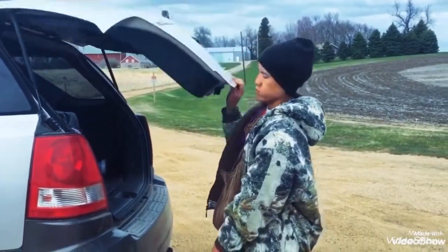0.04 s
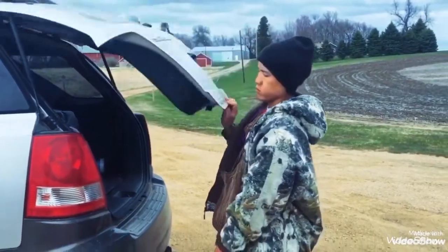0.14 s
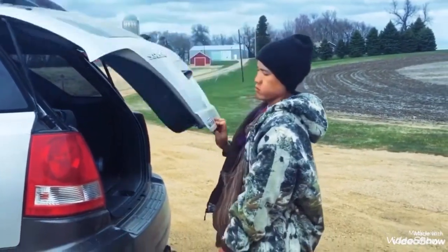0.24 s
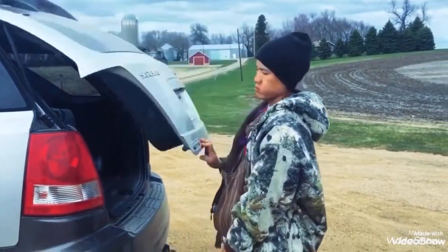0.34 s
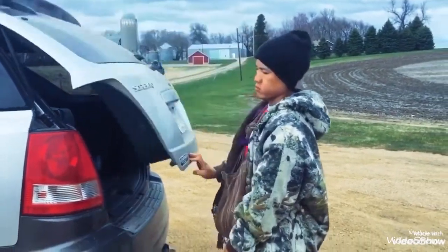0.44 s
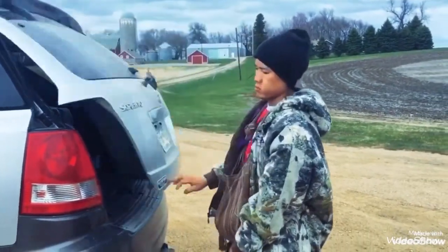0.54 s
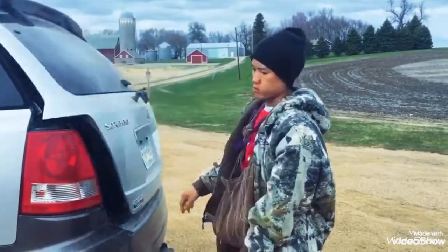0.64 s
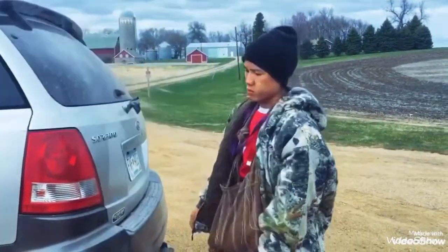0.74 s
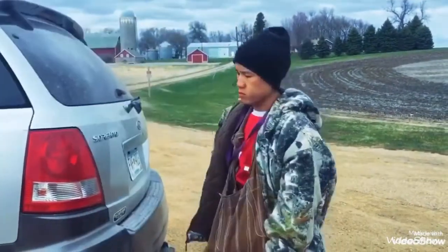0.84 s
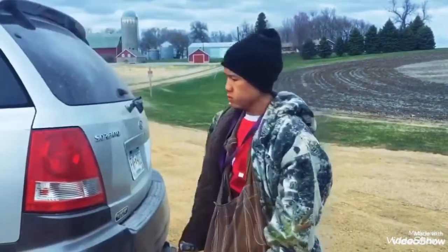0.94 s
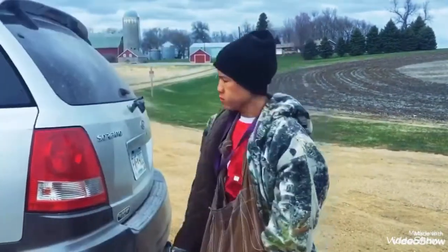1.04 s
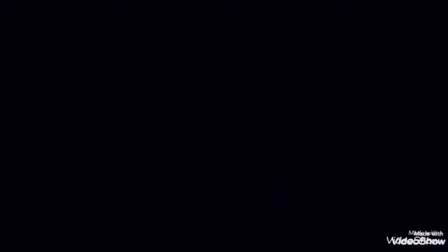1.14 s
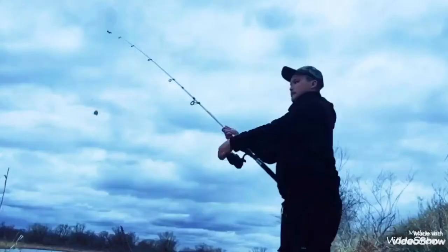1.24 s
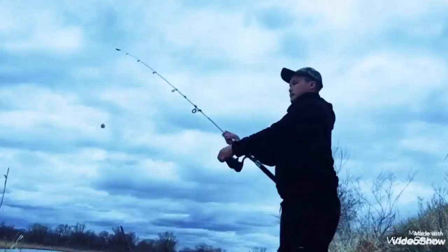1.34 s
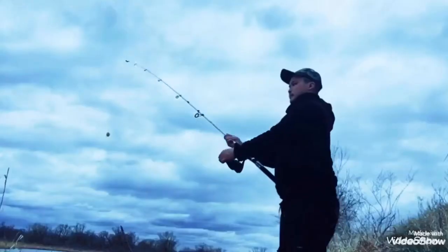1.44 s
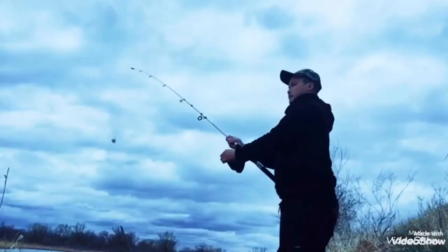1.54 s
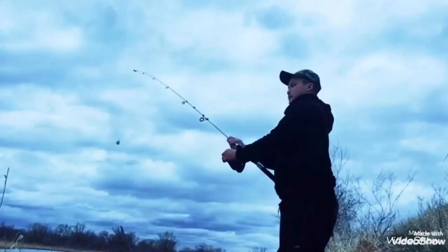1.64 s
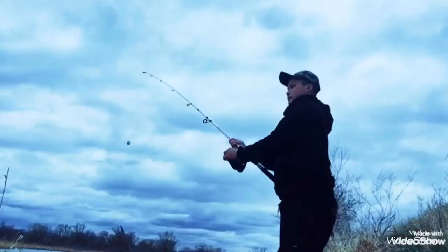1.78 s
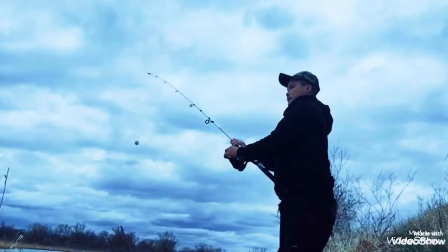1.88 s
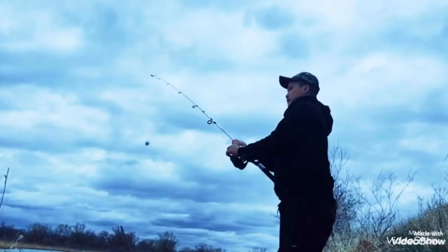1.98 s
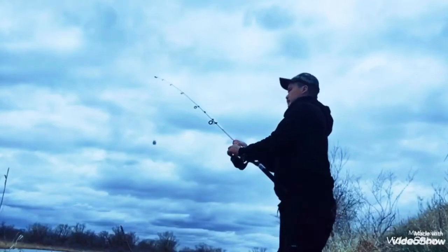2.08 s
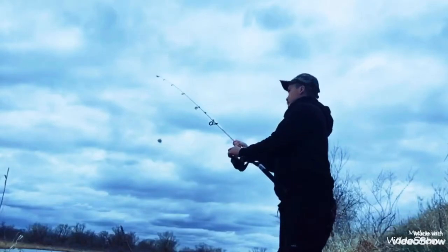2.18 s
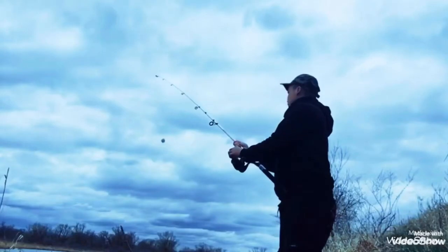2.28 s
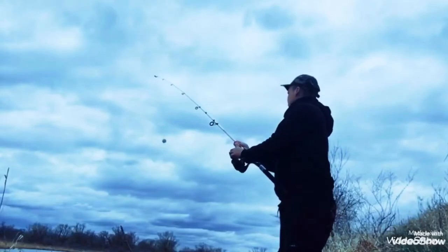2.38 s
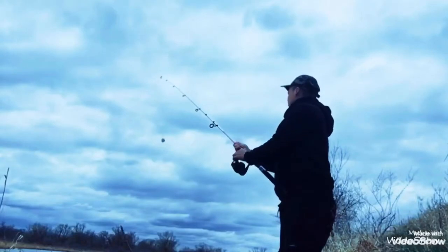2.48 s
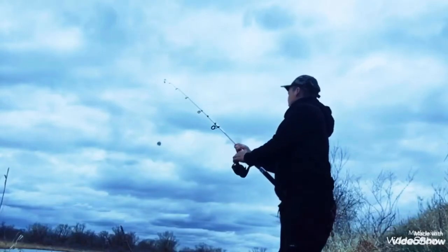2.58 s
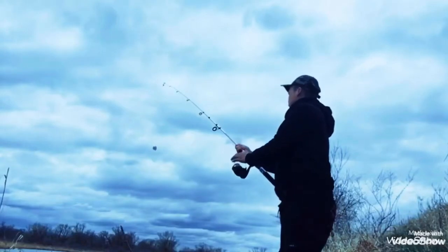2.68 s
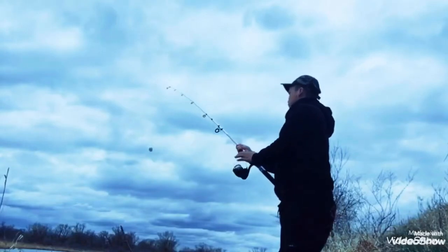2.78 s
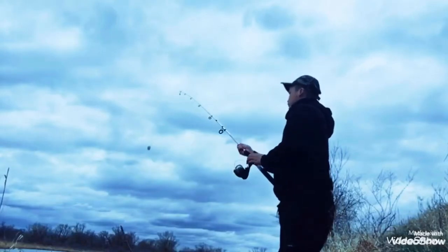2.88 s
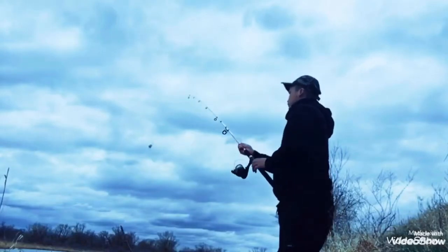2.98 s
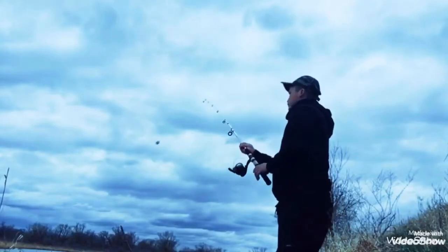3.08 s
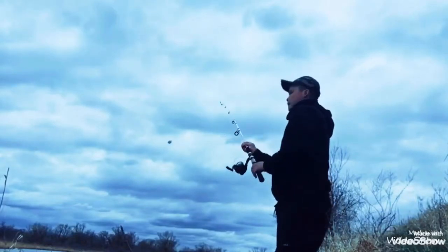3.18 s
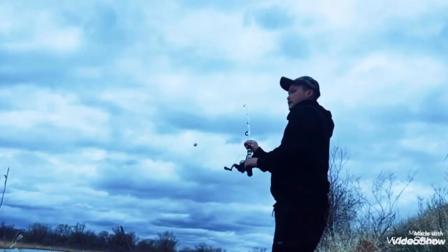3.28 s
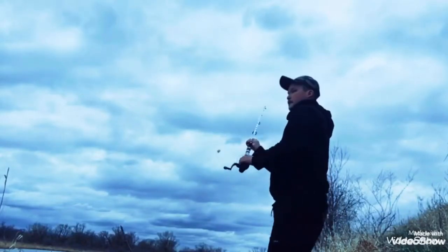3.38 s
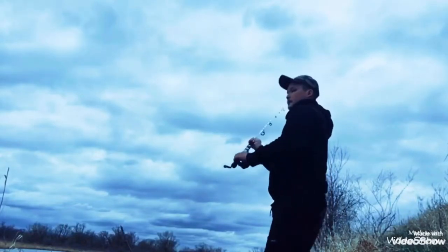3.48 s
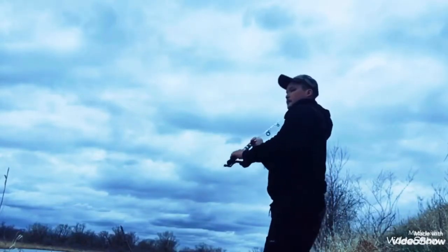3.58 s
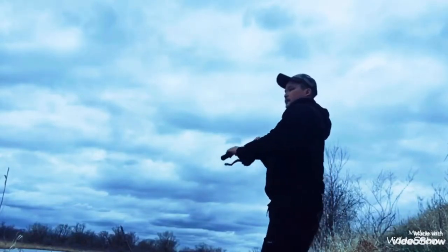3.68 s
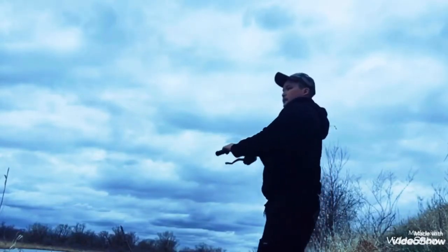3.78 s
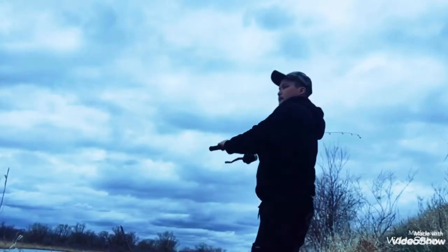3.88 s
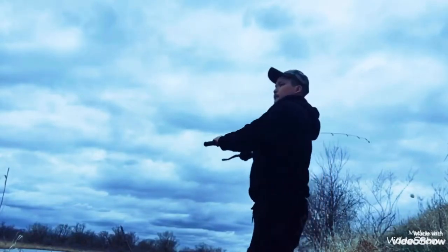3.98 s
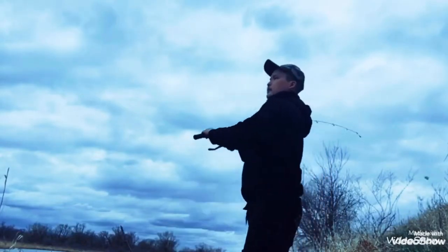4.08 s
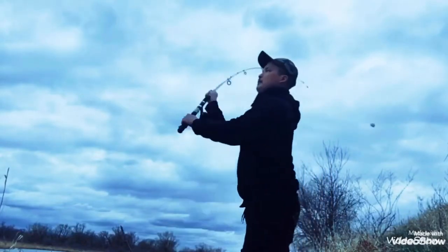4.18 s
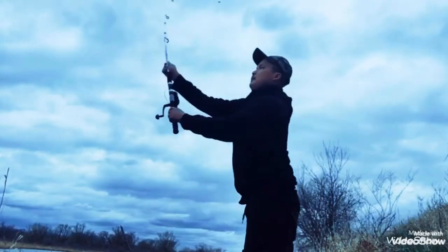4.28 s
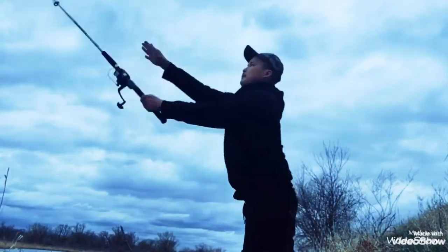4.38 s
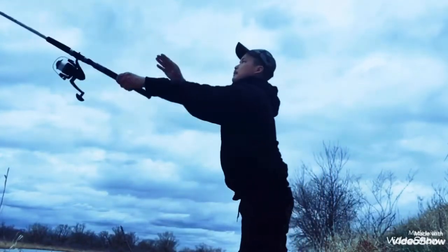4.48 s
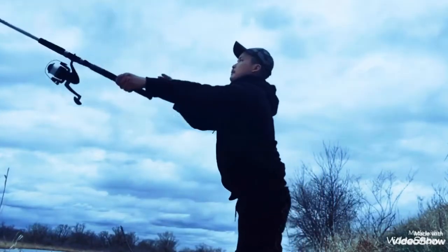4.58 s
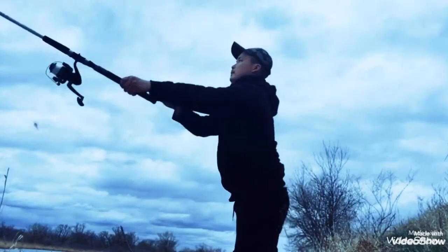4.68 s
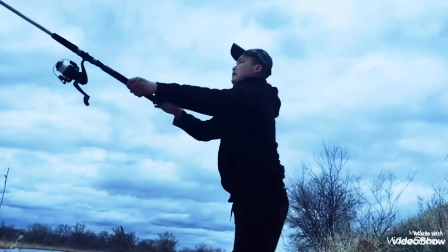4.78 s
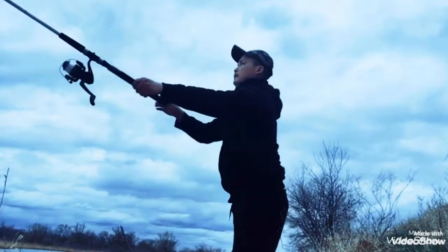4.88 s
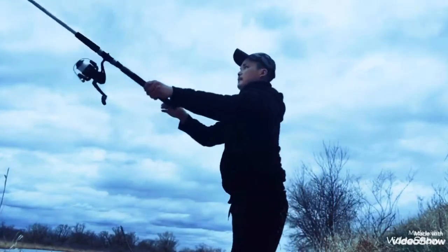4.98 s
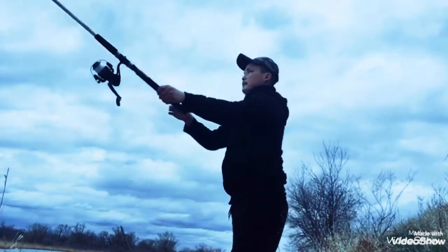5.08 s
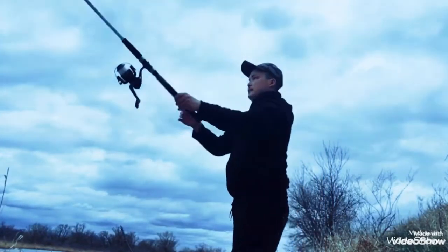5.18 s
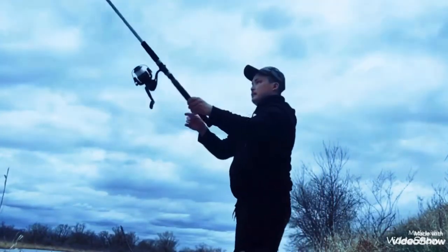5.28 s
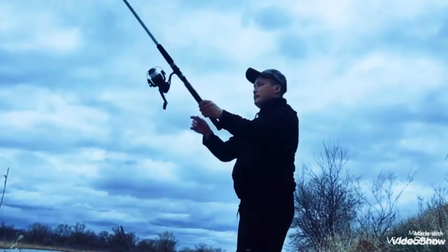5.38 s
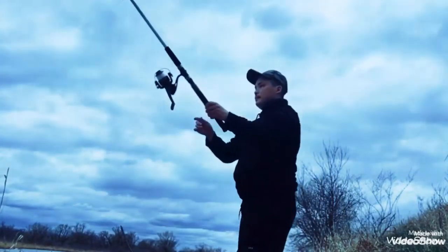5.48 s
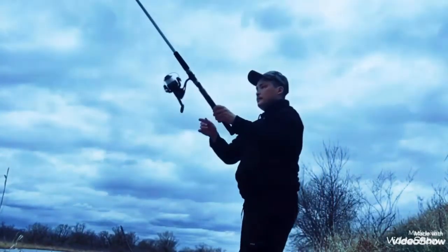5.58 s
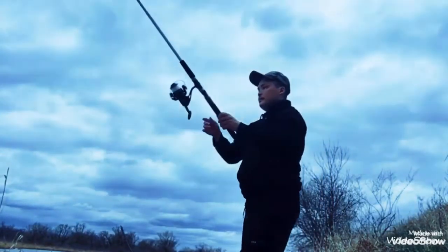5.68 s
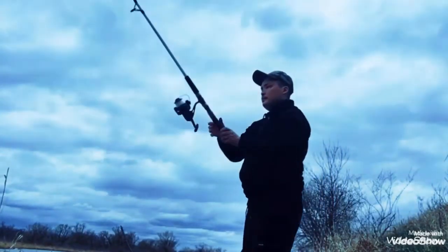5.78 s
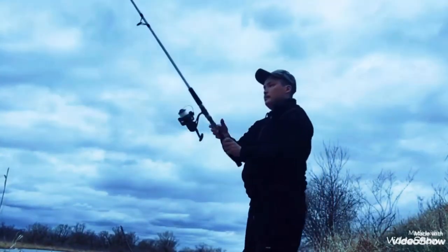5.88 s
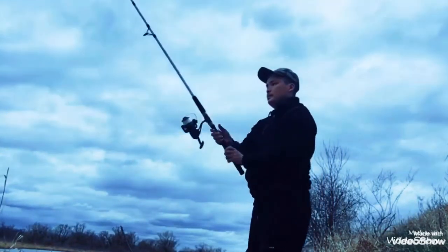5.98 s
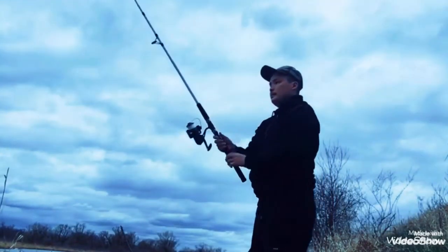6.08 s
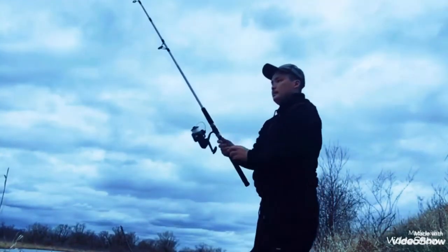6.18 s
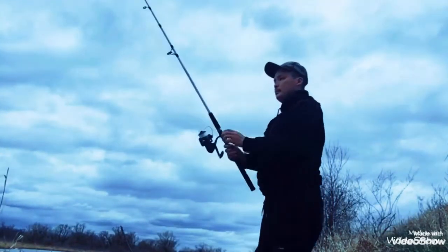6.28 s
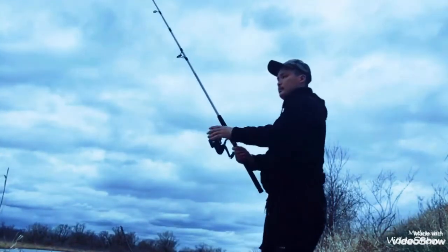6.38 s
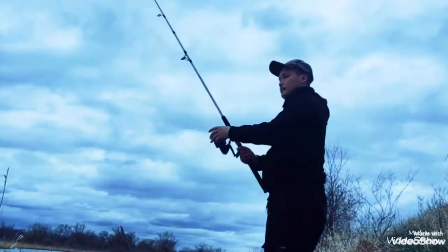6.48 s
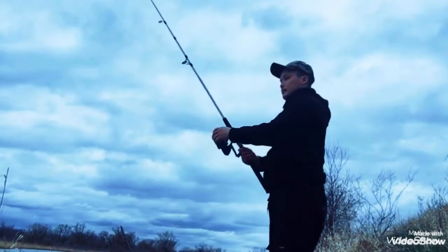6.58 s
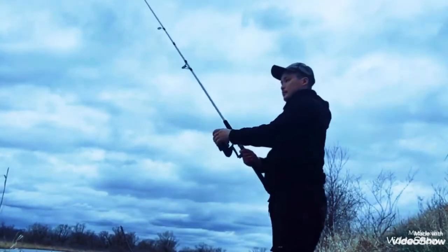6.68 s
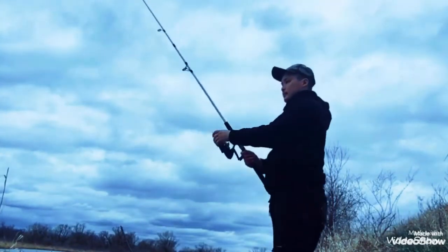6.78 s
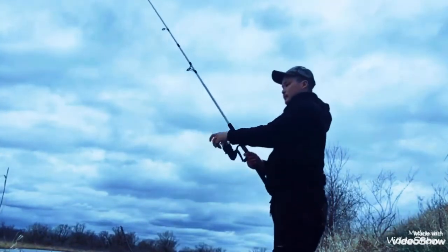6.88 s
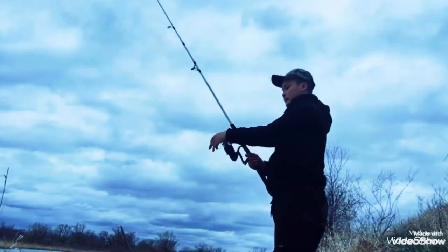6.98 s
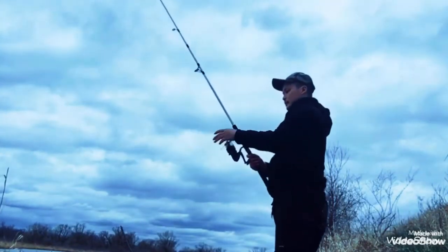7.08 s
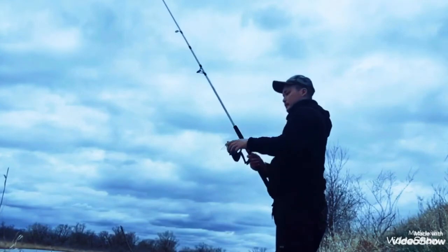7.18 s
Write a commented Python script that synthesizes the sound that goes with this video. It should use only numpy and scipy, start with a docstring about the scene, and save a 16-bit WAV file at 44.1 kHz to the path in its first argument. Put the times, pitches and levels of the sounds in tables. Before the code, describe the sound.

From 0 to 0.5 s, wind rushes softly outdoors and low gusts bump the microphone. At about 0.5 s a vehicle's rear hatch shuts: a small latch click, then a very loud, hard thud with rattling trim, ringing sheet metal and a deep cabin boom, settling in quick rebounds by 0.65 s. Gusts continue, with faint gravel scuffs at 0.73-0.87 s. The yard cuts off at 0.88 s; a brief near silence leads to a very quiet shore at 1 s. Tiny reel clicks come at 1.2 and 1.4 s, a stronger double clack with a short buzz near 2.2 s. Sleeves rustle from 3.8 s; the rod swishes sharply at 4.1 s with a snap at 4.23 s. Bright line hiss flutters and ticks, gradually weakening until a soft, dull plop at 5.78 s. Faint cloth movement follows, then crisp bail clicks around 6.6 s and one at 7.1 s.

```python
"""In a windy yard a rear hatch slams: latch, blow, cabin boom, then a shuffle on gravel. The sound cuts
to a quiet shore: a reel clicks, the rod swings, line hisses off the spool, a lure plops, the bail snaps shut.
Wind, cloth and line are filtered noise or random grains shaped by gain curves. Struck metal is
short noise bursts with decaying modes. Gusts, thuds and plops are a few cycles in a bell-shaped envelope."""
import sys
import numpy as np
from scipy import signal
from scipy.fft import rfft, irfft
from scipy.io import wavfile

SR = 44100
rng = np.random.default_rng(int(sys.argv[2]) if len(sys.argv) > 2 else 0)


def dump_mix(stems):
    """Bounce the given channels to the path in sys.argv[1] as a 16-bit WAV at rate SR."""
    frames = np.atleast_2d(stems).T  # one column per channel
    limited = np.clip(frames, -1, 1)  # hard clip at full scale
    pcm = np.round(limited * 32767).astype(np.int16)
    wavfile.write(sys.argv[1], SR, pcm)


N = 319284


def amp(db):
    """Level to amplitude: 20 dB is a factor of ten."""
    return 10 ** (np.asarray(db) / 20)


def unit(x):
    """Normalization by mean power: scales to rms 1."""
    return x / np.sqrt(np.mean(x ** 2) + 1e-20)


def seconds(size):
    """Sampling: the times [s] of so many samples."""
    return np.arange(size) / SR


def decay_curve(t, t60):
    """Exponential decay: the amplitude falls by 60 dB in t60 seconds."""
    return np.exp(-np.log(1000) * t / t60)


def read(points, hz):
    """Log-frequency interpolation between the points of a curve."""
    f, value = np.transpose(points)
    return np.interp(np.log(hz + 1), np.log(f + 1), value)


def add(mix, s, sound):
    """Superposition: mixes a sound in at time s."""
    part = mix[max(round(s * SR), 0):][:len(sound)]
    part += sound[:len(part)]


EDGE_HZ = 9350  # upper band edge


def colour(x, spectrum, tilt_db=0, peak_hz=1000, peak_db=0):
    """Minimum-phase filtering: a spectrum, a tilt [dB per octave] and one resonance; the result has rms 1."""
    hz = abs(np.fft.fftfreq(len(x), 1 / SR))
    octaves = np.log2(np.maximum(hz, 200) / 1000)  # the tilt pivots at 1 kHz and stops below 200 Hz
    resonance = peak_db / (1 + (6 * (hz / peak_hz - 1)) ** 2)
    top_loss_db = np.clip(hz - EDGE_HZ, 0, 3000) / 50
    gain_db = read(spectrum, hz) + tilt_db * octaves + resonance - top_loss_db
    # the Hilbert transform of log gain gives the phase of a causal filter
    response = np.exp(np.conj(signal.hilbert(np.log(amp(gain_db)))))[:len(x) // 2 + 1]
    return unit(irfft(rfft(x) * response, len(x)))


def grains(per_s, spread_db, smooth):
    """Shot noise: random clicks of uneven size, over a smooth hiss."""
    size = amp(spread_db * np.minimum(rng.exponential(1, N), 4))
    happens = rng.random(N) < per_s / SR
    clicks = size * rng.choice([-1, 1], N) * happens
    return unit(clicks) + smooth * rng.standard_normal(N)


def flutter(size, rate_hz, depth_db):
    """Random amplitude modulation: low-passed noise is the gain in dB, depth_db its rms."""
    hz = np.fft.rfftfreq(size, 1 / SR)
    slow = irfft(rfft(rng.standard_normal(size)) * np.exp(-(hz / rate_hz) ** 2), size)
    return amp(depth_db * unit(slow))


def swells(rows, shape=1.3):
    """Power summation of strokes that each rise to a peak and fall away."""
    t = seconds(N)
    power = 0
    for s, db, rise, fall in rows:
        distance = np.maximum((s - t) / rise, (t - s) / fall)
        power = power + (amp(db) * np.exp(-np.minimum(distance, 10) ** shape)) ** 2
    return np.sqrt(power)


def burst(spectrum, tilt_db, t60, peak_hz=1000, peak_db=0):
    """Impact noise: decaying broadband noise with a sharp start, nominally at rms 1 when it begins."""
    decay = decay_curve(seconds(SR), t60)
    contact = colour(rng.standard_normal(SR) * decay, spectrum, tilt_db, peak_hz, peak_db)
    return contact * np.sqrt(np.mean(decay ** 2))


def ring(modes):
    """Modal superposition: decaying sines of a struck object, neighbours of opposite sign."""
    t = seconds(SR)
    total = 0
    for k, (hz, db, t60) in enumerate(modes):
        total = total + (-1) ** k * amp(db - 60 * t / t60) * np.sin(2 * np.pi * hz * t)
    return total


def puff(s, db, hz, half, glide=0):
    """A Gaussian pressure pulse: a few cycles around time s; glide is in octaves per second."""
    t = seconds(8192) - 4096 / SR
    turns = np.cumsum(hz * 2 ** (glide * t)) / SR
    phase = 2 * np.pi * (turns - turns[len(t) // 2])
    wave = amp(db) * np.exp(-(t / half) ** 2) * np.cos(phase)
    return np.interp(seconds(N) - s, t, wave, left=0, right=0)


EDDY_HZ = 61  # pitch of the largest eddy
EDDY_STEP, EDDY_SHRINK = 1.68, .65  # each next eddy is higher and shorter by these factors


def gust(s, db, half, step_db, scatter=0.36, count=3):
    """Turbulent cascade: a large eddy breaks into smaller, quicker ones."""
    offsets = rng.uniform(-1, 1, count)
    total = 0
    for k in range(count):
        when = s + min(k, 1) * scatter * half * offsets[k]  # the largest eddy stays at s
        total = total + puff(when, db + k * step_db, EDDY_HZ * EDDY_STEP ** k, half * EDDY_SHRINK ** k)
    return total


# steady wind over the yard: (frequency [Hz], relative density [dB per Hz])
WIND_SPECTRUM = [(15, -32), (25, -2), (64, -1), (171, -10), (266, -10.5), (748, -23.5), (1190, -23),
                 (1450, -27), (1770, -23), (3200, -28.5), (3440, -26), (4980, -36.5), (6700, -34.5),
                 (9000, -44.5), (11700, -77), (19800, -120)]
WIND_DB = -42.5  # rms level
# gusts that hit the microphone:
# (time [s], peak of the largest eddy [dB], half length [s], gain per smaller eddy [dB])
WIND_GUSTS = [(.03, -40, .014, -7), (.1, -32.5, .025, -1), (.178, -39.5, .012, -17), (.296, -29.5, .02, -1),
              (.444, -26.5, .012, -2.5), (.495, -31, .025, -12), (.654, -29.5, .014, 2.5),
              (0.678, -25.5, 0.0117, -1.5), (.815, -27, .016, -6.5)]


def wind():
    """Turbulence noise: a steady rush with gusts bumping the microphone."""
    rush = amp(WIND_DB) * colour(rng.standard_normal(N), WIND_SPECTRUM)
    return rush + sum(gust(*row) for row in WIND_GUSTS)


# stones under a shoe: (frequency [Hz], relative density [dB per Hz])
GRAVEL_SPECTRUM = [(150, -38), (250, -6.5), (462, -3.5), (498, -2), (653, -4), (949, -11), (1470, -8),
                   (1580, -10), (6670, -28.5), (9000, -31.5), (11700, -68), (19800, -120)]
# shifts of the shoe: (peak time [s], level [dB], rise [s], fall [s])
SHOE_SCUFFS = [(.734, -40, 0.004, 0.022), (.78, -38, .022, 0.044), (.86, -43, 0.026, 0.028)]


def shuffle():
    """Granular friction: stones grind under a shoe in many small contacts."""
    stones = grains(per_s=3900, spread_db=5.5, smooth=0.57)
    return swells(SHOE_SCUFFS) * colour(stones, GRAVEL_SPECTRUM)


def cabin_boom(s=.5305, db=-2, low_hz=57, high_hz=67.2, t60=0.26):
    """Coupled resonators: the hatch on its seal and the cabin air trade energy, so two close modes beat."""
    t = np.maximum(seconds(N) - s, 0)
    beat = np.cos(2 * np.pi * low_hz * t) - np.cos(2 * np.pi * high_hz * t)
    return amp(db) * decay_curve(t, t60) * beat


REBOUND_S, REBOUND_GAP_S, REBOUND_SHRINK = .603, 0.019, .7  # first blow, first gap, factor on each next gap
REBOUND_DB, REBOUND_LOSS_DB = -25.5, 6.3  # first blow, loss at each next one


def rebounds(tilt_db=-2, brighten_db=1.7, lowest_hz=250, hold=.27, count=3):
    """Inelastic rebound: the hatch settles in its lock, each blow weaker, thinner and after a shorter gap."""
    s = REBOUND_S
    for k in range(count):
        yield s, REBOUND_DB - k * REBOUND_LOSS_DB, tilt_db + k * brighten_db, lowest_hz, hold
        s += REBOUND_GAP_S * REBOUND_SHRINK ** k


# blows of the closing hatch, latch first:
# (time [s], level [dB], tilt [dB per octave], high-pass corner [Hz], share of ring time and panel ring [1])
HATCH_BLOWS = [(.503, -43.5, 2, 800, .1), (.5165, -18, -1, 420, .44), (.528, -17.5, 1.5, 900, .45),
               (.532, -14.5, -2.5, 109, 0.97), (.55, -27.5, 2, 200, .25), (.5814, -19.5, -0.5, 900, .33)]
# colour of hatch and trim: (frequency [Hz], relative density [dB per Hz])
HATCH_SPECTRUM = [(60, -4.5), (130, 3), (210, -4), (310, -4.5), (400, -4), (520, -3), (680, -1), (860, -9),
                  (1050, -8.5), (1450, -9), (2050, -10), (3300, -20.5), (5000, -25.5), (7000, -28),
                  (9200, -30.5)]
# full ring time of the trim, before the share of each blow: (frequency [Hz], decay by 60 dB [s])
TRIM_T60 = [(100, .36), (400, 0.41), (1500, 0.23), (4000, 0.29), (9000, .26)]
# modes of the sheet metal: (frequency [Hz], relative level [dB], decay by 60 dB [s])
PANEL_MODES = [(114.5, -5.5, 0.2), (152, 1, 0.36), (207.2, -1, .38), (248, -7, 0.29), (323, -2, 0.27),
               (391, -1, .38), (465, -4.5, 0.3), (534, -3, .36), (576, 1, 0.19), (667, -9, 0.99),
               (716, -6, .3), (787.3, -6.5, 0.36), (920, -6.5, 0.33), (1077, -11, 0.28), (1150, -10, .28),
               (1303, -5, .28), (1355, -9.5, 0.33), (1482, -9.5, .25), (1533, -7.5, 0.26),
               (1720, -14, 0.16), (1833, -7.5, .26), (1880, -8.5, 0.25), (2121, -7.5, .2),
               (2261, -11, 0.23)]
# the hatch shoves its rubber seal and the air: (time [s], peak [dB], frequency [Hz], half length [s])
SEAL_THUDS = [(.534, -10.5, 340, .003), (.5388, -10, 135, .009), (.548, -21, 98, .018),
              (.553, -23, 36, .025)]


def hatch(panel_db=-14, yard_db=-34, yard_t60=0.97):
    """Impact excitation: each blow rattles the trim and rings the panel; the yard returns a faint tail."""
    out, t = np.zeros(N), seconds(SR)
    for s, db, tilt_db, lowest_hz, hold in [*HATCH_BLOWS, *rebounds()]:
        clatter = rng.standard_normal(SR) * flutter(SR, rate_hz=140, depth_db=3.0)
        # each frequency band decays at its own rate
        hz, when, bands = signal.stft(colour(clatter, HATCH_SPECTRUM, tilt_db), SR, nperseg=256)
        decay = decay_curve(when, max(hold, .02) * read(TRIM_T60, hz)[:, None])
        tail = amp(yard_db) * decay_curve(when, yard_t60)
        rattle = signal.istft(bands * (decay + tail), SR, nperseg=256)[1][:SR]
        onset = 1 - np.exp(-t / .0004)
        blow = (rattle + hold * amp(panel_db) * ring(PANEL_MODES)) * onset
        # small parts cannot move the bass
        high_pass = signal.butter(2, lowest_hz, "high", fs=SR, output="sos")
        add(out, s, amp(db) * signal.sosfilt(high_pass, blow))
    return out + cabin_boom() + sum(puff(*row) for row in SEAL_THUDS)


# air at the shore: (frequency [Hz], relative density [dB per Hz])
SHORE_SPECTRUM = [(13, -38), (22, -12), (81, 1), (125, -5), (142, -12.5), (223, -14), (294, -17.5),
                  (333, -16.5), (474, -21), (889, -23.5), (959, -25), (1170, -24.5), (1630, -27.5),
                  (3290, -28.5), (9000, -38), (11700, -98), (19800, -120)]
SHORE_DB = -63  # rms level before the fade
# soft plops and bumps: (time [s], peak [dB], frequency [Hz], half length [s], glide [octaves per s])
SOFT_PLOPS = [(3.178, -61, 520, .003, 0), (3.18, -58, 1180, .0015, 0), (5.779, -54, 540, .003, 0),
              (5.783, -46.5, 271, 0.0043, 0), (5.844, -54.5, 261, 0.024, 22)]
# colour of the splash: (frequency [Hz], relative density [dB per Hz])
SPLASH_SPECTRUM = [(100, 4), (250, 1.5), (560, 1), (720, -4), (900, -30), (3000, -53)]
# the water closes over the lure: (time [s], level [dB], decay by 60 dB [s])
LURE_SPLASHES = [(5.7743, -50, 0.13), (5.829, -63, 0.3)]


def shore():
    """Ambient noise: low distant rumble under faint hiss, with a few soft plops and a dull splash."""
    out = amp(SHORE_DB) * colour(rng.standard_normal(N), SHORE_SPECTRUM)
    out += sum(puff(*row) for row in SOFT_PLOPS)
    for s, db, t60 in LURE_SPLASHES:
        add(out, s, amp(db) * burst(SPLASH_SPECTRUM, 0, t60))
    return out


# the gears whirr as slack is wound in: (peak time [s], level [dB], rise [s], fall [s])
SLACK_WINDING = [(1.15, -75, 0.32, 0.12), (2.03, -78, 0.11, .13)]
# resonances of the gears: (frequency [Hz], relative density [dB per Hz])
GEAR_SPECTRUM = [(700, -33), (1300, -7.5), (1580, 6), (1900, -10), (3300, -14), (9000, -27)]
# a loose part of the reel buzzes: (peak time [s], level [dB], rise [s], fall [s])
LOOSE_CHATTER = [(2.19, -46, .003, 0.039), (2.305, -65, .02, 0.028), (2.39, -65.5, .007, 0.006),
                 (2.518, -68.5, 0.021, .02)]
# resonances of the loose part: (frequency [Hz], relative density [dB per Hz])
CHATTER_SPECTRUM = [(1200, -38), (1950, -13), (2400, 0), (2950, -9), (4000, -18), (9000, -30)]


def reel_works():
    """Resonant filtering of dense tiny contacts: gear teeth whirr and a loose part buzzes."""
    teeth = grains(per_s=400, spread_db=0, smooth=0.88)
    gears = swells(SLACK_WINDING) * colour(teeth, GEAR_SPECTRUM)
    rattling = grains(per_s=450, spread_db=3, smooth=.6)
    return gears + swells(LOOSE_CHATTER) * colour(rattling, CHATTER_SPECTRUM)


# clicks of the reel and its bail: (time [s], snap [dB], tilt [dB per octave], pitch of the part [Hz],
# knock of the body [dB], travel to the stop [s])
CLICKS = [(1.161, -59, 2, 3200, -76, .004), (1.216, -62, 7, 3000, -85, .003),
          (1.4129, -37, 1, 2800, -48, 0.016), (1.935, -58, -16.5, 1400, -56.5, .002),
          (2.1784, -28.5, -.5, 3000, -25.5, .015), (2.2335, -40.5, 3.5, 3780, -49, .008),
          (2.276, -59, 2, 4100, -80, .004), (2.475, -58.5, -3.5, 3000, -68, 0.0029),
          (6.592, -58.5, 4, 4000, -58, .002), (6.621, -51.5, .5, 4400, -56, .002),
          (6.64, -40.5, 2.5, 2570, -39.5, .006), (6.684, -57, 1, 3420, -58.5, 0.018),
          (6.712, -57.5, 2.5, 4200, -66.5, 0.0069), (6.994, -64, -11, 1200, -71, .002),
          (7.098, -48, 4.5, 3720, -52.5, 0.0059)]
# colour of a snap: (frequency [Hz], relative density [dB per Hz])
SNAP_SPECTRUM = [(300, -45), (750, -26), (1050, -17), (1650, 6), (2100, -4), (2700, -0.5), (3500, 1.5),
                 (4300, -4), (5000, -11), (6500, -7.5), (9000, -14)]
# modes of the hollow body: (frequency [Hz], relative level [dB], decay by 60 dB [s])
BODY_MODES = [(1075, -19, 0.056), (1420, -7, 0.024), (1645.4, 1.5, 0.039), (1860, -14, 0.029)]
# modes of wire and springs: (frequency [Hz], relative level [dB], decay by 60 dB [s])
BAIL_MODES = [(2680, -4, 0.018), (2910, -14, 0.034), (3420, 5, 0.014), (3740, -7, .03), (3900, 2, 0.028),
              (5300, -5.5, 0.066), (6700, -18, 0.038), (6760, -7.5, 0.066), (8470, -5, 0.045)]
SNAP_T60, STOP_T60 = 0.037, 0.033  # decay by 60 dB [s]
STOP_DB = -11.5  # the stop relative to the snap


def reel(bail_db=-13, part_db=7):
    """Two-stage impact: a part snaps and rings the bail wire, then hits its stop and knocks the hollow body."""
    out, wire = np.zeros(N), amp(bail_db) * ring(BAIL_MODES)
    body_onset = 1 - np.exp(-(seconds(SR) / 0.001) ** 2)  # the body takes a moment to answer
    knock = ring(BODY_MODES) * body_onset
    for s, snap_db, tilt_db, hz, knock_db, travel in CLICKS:
        snap = burst(SNAP_SPECTRUM, tilt_db, SNAP_T60, hz, part_db) + wire
        add(out, s, amp(snap_db) * snap)
        stop = burst(SNAP_SPECTRUM, tilt_db, STOP_T60, hz, part_db) + wire
        add(out, s + travel, amp(snap_db + STOP_DB) * stop + amp(knock_db) * knock)
    return out


# the line leaves the spool, gathers speed, is slowed by drag and stops when the lure lands
RELEASE_S, SPIN_UP_S, LANDING_S = 4.1, 0.26, 5.775  # start, duration, landing
RUN_DB, DRAG_DB_PER_S, STOP_DB_PER_S = -56, 6.6, 170


def line_run(t):
    """Speed-dependent friction noise: the gain of the line's hiss at times t follows the line's speed."""
    spin_up = np.clip((t - RELEASE_S) / SPIN_UP_S, 0, 1)
    drag_db = DRAG_DB_PER_S * np.maximum(t - RELEASE_S - SPIN_UP_S, 0)
    stop_db = STOP_DB_PER_S * np.maximum(t - LANDING_S, 0)
    return spin_up * amp(RUN_DB - drag_db - stop_db)


# colour of line on spool and guides: (frequency [Hz], relative density [dB per Hz])
LINE_SPECTRUM = [(530, -46), (900, -28.5), (1330, 0), (1730, -6), (2370, -4), (2820, 1.5), (4340, -0.5),
                 (4930, -10), (5380, -4.5), (5990, -6), (6800, -2.5), (8600, -0.5), (9300, -11.5),
                 (12100, -51), (20500, -120)]


def line_ticks(over_db=8, spread_db=6, tilt_db=-2.0, t60=0.015, count=16):
    """Random impacts: one coil brushes the guides in each equal time slot, as hard as the line is fast."""
    out = np.zeros(N)
    for k, (when, size) in enumerate(rng.random((count, 2))):
        s = RELEASE_S + (LANDING_S - RELEASE_S) * (k + when) / count
        level = line_run(s) * amp(over_db + spread_db * size)
        add(out, s, level * burst(LINE_SPECTRUM, tilt_db, t60))
    return out


# sleeves rub with each move of the arms: (peak time [s], level [dB], rise [s], fall [s])
SLEEVE_MOVES = [(3.12, -69.5, 0.26, 0.21), (3.83, -57.5, 0.09, 0.12), (4.08, -55.5, 0.069, 0.17),
                (4.3, -58, 0.18, 0.97), (5.7, -62, 0.72, 0.23), (6.04, -63.5, .05, 0.28),
                (6.33, -60, 0.1, 0.09)]
# colour of cloth: (frequency [Hz], relative density [dB per Hz])
CLOTH_SPECTRUM = [(70, -22.5), (160, -1), (300, -8), (500, -6), (830, -14), (1310, -1), (2200, -4),
                  (3120, -5), (4450, -8), (4890, -11), (6960, -7.5), (9000, -16)]
# the rod whips forward and springs back: (peak time [s], level [dB], rise [s], fall [s])
ROD_WHIPS = [(4.1, -37.5, 0.023, .022), (4.235, -48, .018, 0.014)]
# colour of the rod in the air: (frequency [Hz], relative density [dB per Hz])
SWISH_SPECTRUM = [(60, -30), (150, -20), (300, -22), (650, -16), (900, -17), (1340, -2.5), (2180, -8),
                  (2770, 2), (3100, -6), (4430, -4.5), (4930, -18), (5500, -14.5), (9300, -14.5)]
# loose coils rush off the spool together: (peak time [s], level [dB], rise [s], fall [s])
COIL_SURGES = [(4.16, -58, .03, 0.055), (4.44, -54, .1, 0.15), (4.95, -60, .06, .07),
               (5.35, -58.5, .014, .13)]
# hard slaps of the line on the guides: (time [s], level [dB], tilt [dB per octave])
LINE_SLAPS = [(4.231, -32.5, 4.5), (4.4587, -40.5, 1), (4.6546, -40.5, -.5), (4.99, -40, -3),
              (5.0261, -42.5, 2.5), (5.489, -46.5, 0), (5.5121, -43, -1.5), (5.5824, -42, 1.5),
              (5.8102, -40, -6), (6.371, -47, 5)]


def cast(slap_t60=0.012, guide_hz=3400, guide_db=5):
    """Friction and flow noise: sleeves rustle, the rod whips, coils of line flutter and tick in the guides."""
    rustle = grains(per_s=2700, spread_db=3.0, smooth=0.9) * flutter(N, rate_hz=29, depth_db=2.0)
    whip = grains(per_s=7600, spread_db=0.5, smooth=0.56) * flutter(N, rate_hz=430, depth_db=2.5)
    coils = grains(per_s=1200, spread_db=3, smooth=1.1) * flutter(N, rate_hz=90, depth_db=2.3)
    steady_run = line_run(seconds(N)) * flutter(N, rate_hz=11, depth_db=1.3)
    run = np.hypot(steady_run, swells(COIL_SURGES))
    out = swells(SLEEVE_MOVES) * colour(rustle, CLOTH_SPECTRUM)
    out += swells(ROD_WHIPS) * colour(whip, SWISH_SPECTRUM)
    out += run * colour(coils, LINE_SPECTRUM)
    for s, db, tilt_db in LINE_SLAPS:
        add(out, s, amp(db) * burst(LINE_SPECTRUM, tilt_db, slap_t60, guide_hz, guide_db))
    return out + line_ticks()


# the yard is cut to a trace: (time [s], gain [1])
YARD_GAIN = [(.879, 1), (.881, 0.23), (.9, 0.0014)]
# the shore comes in: (time [s], gain [1])
SHORE_GAIN = [(.985, 0), (.995, 0.96)]


def scene():
    """Linear superposition: the yard, a moment of near-silence, then the shore."""
    t = seconds(N)
    yard = (wind() + shuffle() + hatch()) * np.interp(t, *np.transpose(YARD_GAIN))
    fishing = (shore() + reel_works() + reel() + cast()) * np.interp(t, *np.transpose(SHORE_GAIN))
    return (yard + fishing)[None]


def record(dry):
    """Amplitude and band limiting: full scale caps the peaks, then a low-pass removes the top."""
    capped = np.clip(dry, -1, 1)
    low_pass = signal.firwin(255, EDGE_HZ, window=("kaiser", 9), fs=SR)
    return signal.oaconvolve(capped, low_pass[None], "same")


dry = scene()
out = record(dry)
dump_mix(out)
```